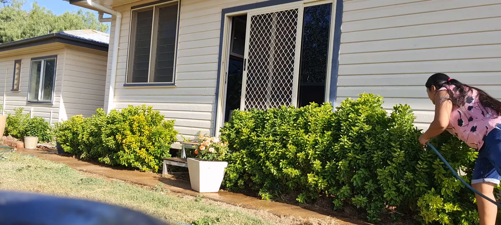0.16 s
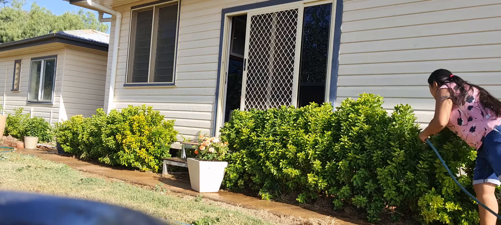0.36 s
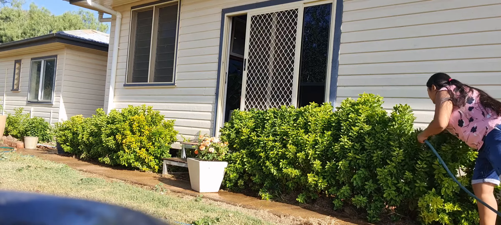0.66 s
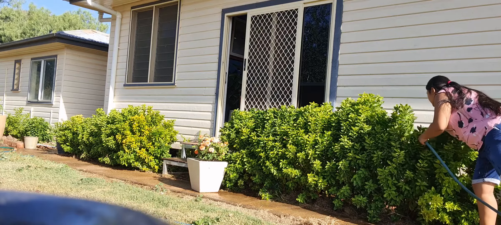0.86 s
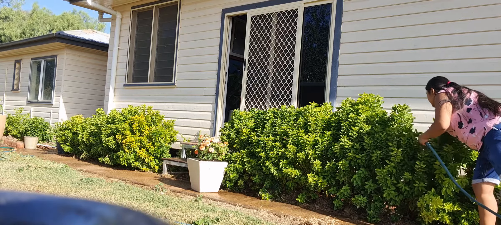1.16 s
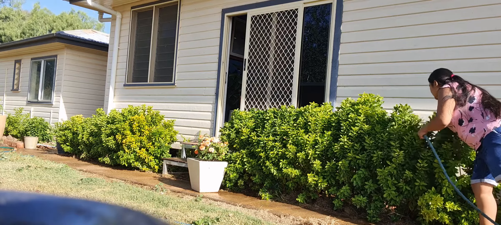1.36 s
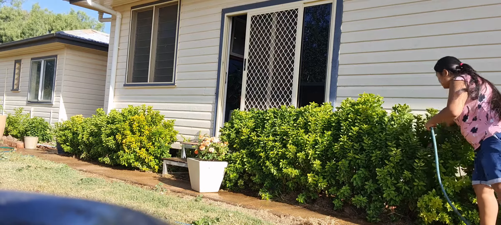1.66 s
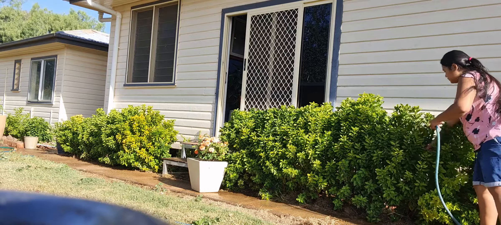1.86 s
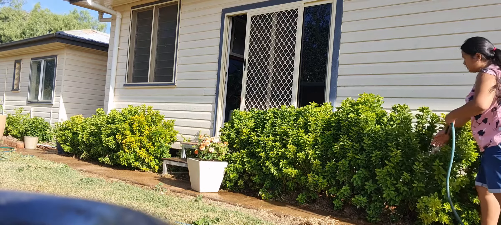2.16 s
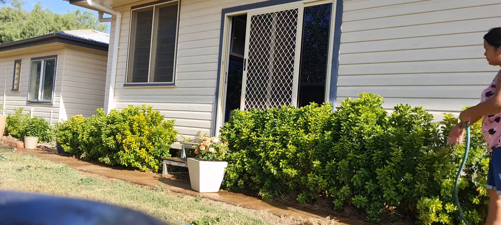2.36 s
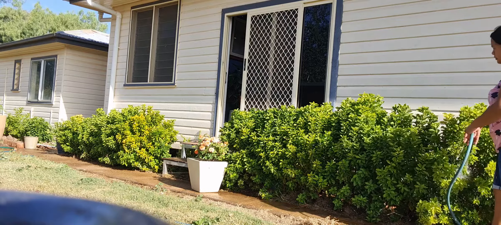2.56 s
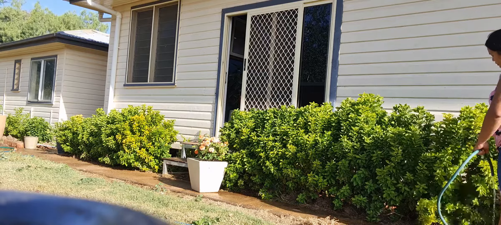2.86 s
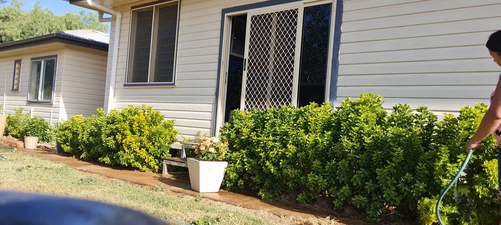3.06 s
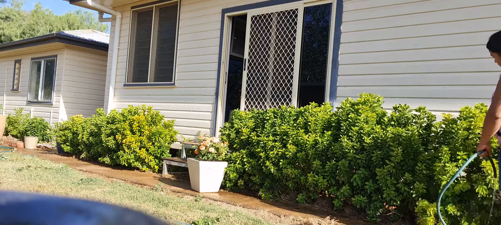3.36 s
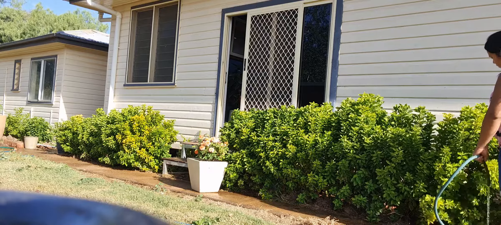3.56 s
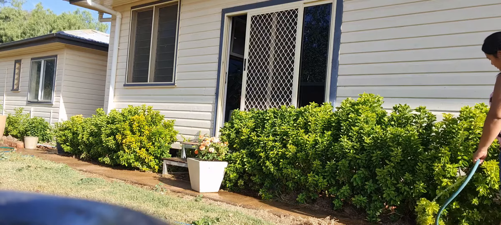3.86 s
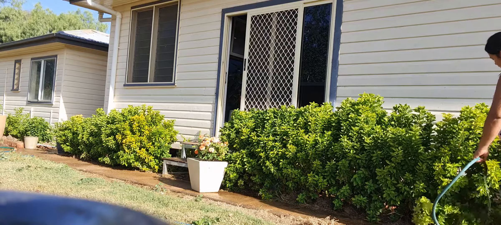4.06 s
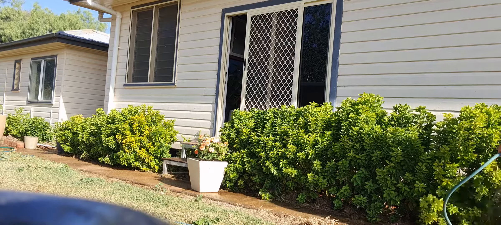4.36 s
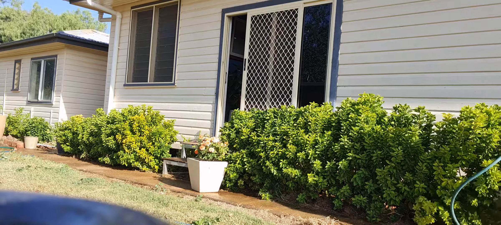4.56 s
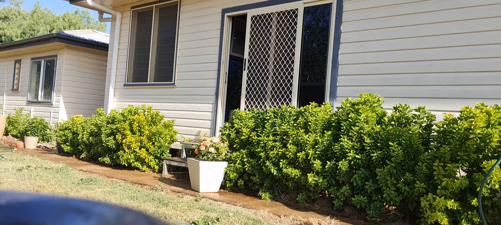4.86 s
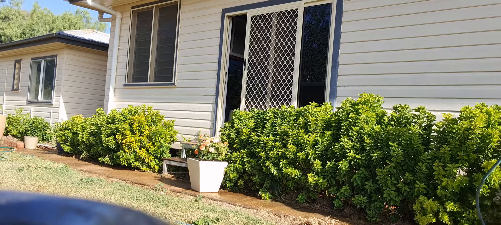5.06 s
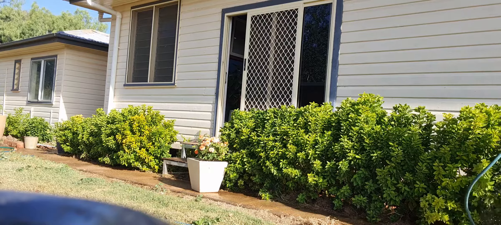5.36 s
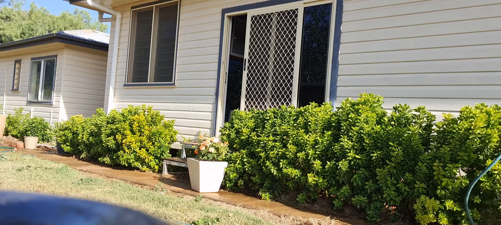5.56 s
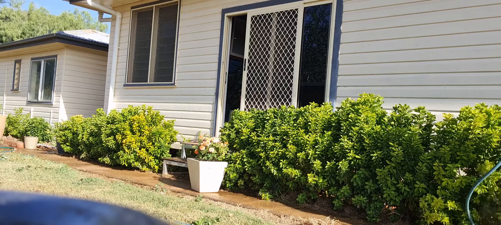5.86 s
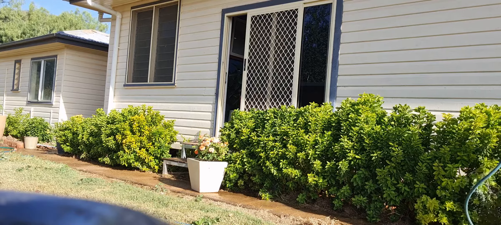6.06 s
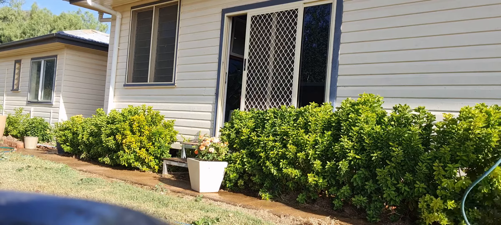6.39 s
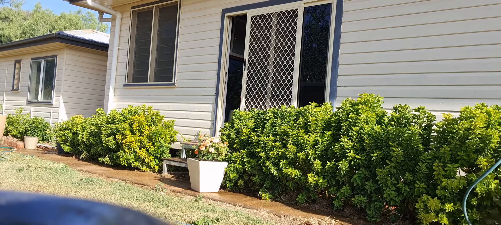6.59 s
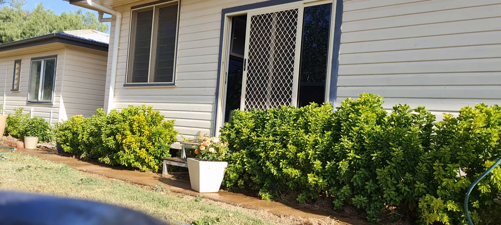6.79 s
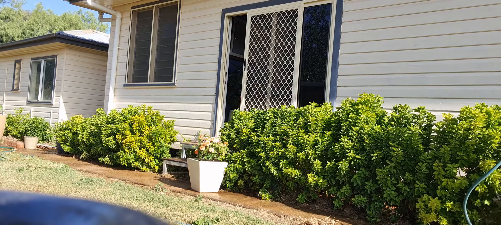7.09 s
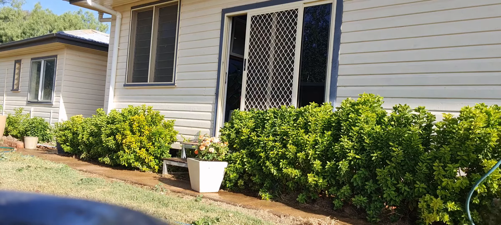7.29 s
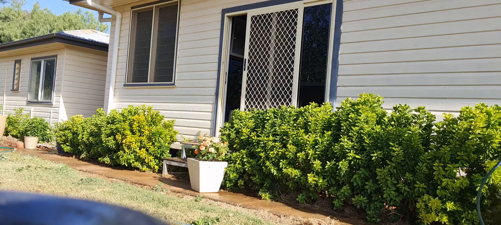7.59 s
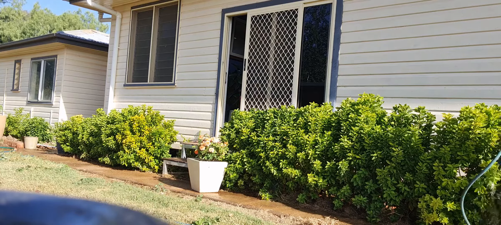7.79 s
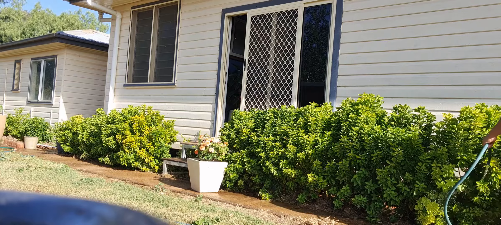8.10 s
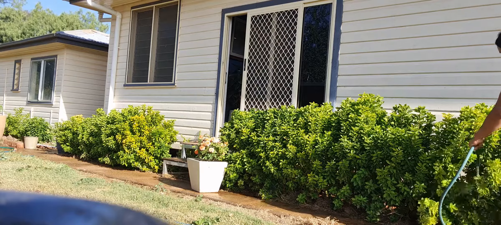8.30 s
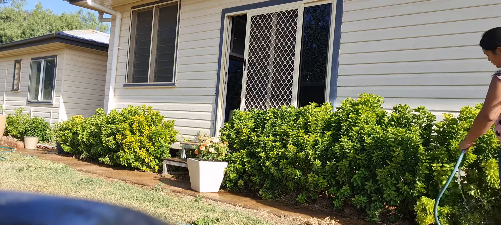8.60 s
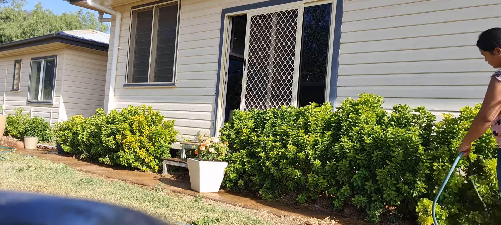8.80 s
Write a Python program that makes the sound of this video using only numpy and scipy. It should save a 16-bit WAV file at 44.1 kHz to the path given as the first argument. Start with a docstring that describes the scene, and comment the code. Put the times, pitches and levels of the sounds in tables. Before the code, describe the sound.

Water from a hose patters and fizzes over shrubs outdoors, with crisp leaf ticks, small puddle plops, a brief distant bird call and wind bumps.

```python
"""Garden hose on a hedge

A hose, a little to the right, waters a hedge beside a house wall. The spray is a cloud of damped rings:
patter on leaves, hiss of mist, splatter on soil. Single gouts slap leaves (a sagging tick, a knock and
noise) or plop into a puddle (a bubble rising in pitch). A far bird whistles six short notes, a breeze of
filtered noise and low eddies rumbles and thumps on the two microphone ports, and beneath lie a murmur with
a fuzzy hum, faint hoots and hollow bumps. Decaying noise tails give the scatter from foliage and wall."""
import sys
import numpy as np
from scipy import signal
from scipy.fft import rfft, irfft, next_fast_len
from scipy.io import wavfile
from scipy.ndimage import map_coordinates

SR = 44100
rng = np.random.default_rng(int(sys.argv[2]) if len(sys.argv) > 2 else 0)


def inscribe(sig):
    """Save sig as 16-bit PCM at rate SR to the path in sys.argv[1].

    A 1-D sig is mono; a 2-D sig holds one channel per row.
    Samples are clipped to [-1, 1] before scaling.
    """
    pcm = np.round(np.clip(np.atleast_2d(sig).T, -1, 1) * 32767)
    wavfile.write(sys.argv[1], SR, pcm.astype(np.int16))


N = 394254
TOP_HZ = 15850  # upper band limit

# Levels of layers and events stand before the trims and reverberation of their functions.

# Murmur of the neighbourhood, spectral shape: (frequency [Hz], gain [dB])
MURMUR_SPECTRUM = [(20, 4), (60, 10), (90, 16), (140, 5.5), (220, 4.5), (320, 4), (500, 5.5), (700, 4.5),
                   (1000, 5), (1500, 2.5), (3000, -18), (16000, -28)]
# Left-right correlation of the murmur: (frequency [Hz], correlation [-1 to 1])
MURMUR_CORRELATION = [(60, 1), (200, 0.69), (450, 0.38), (800, 0), (2000, 0)]
# Faint far hoots and a thin whistle: (time [s], pitch [Hz], level [dB], half length [s])
HOOTS = [(1.5, 472, -76, .09), (1.71, 502, -65.5, 0.047), (7.615, 1860, -69.5, 0.059)]
# Soft hollow bumps: (time [s], level [dB], pitch [Hz], 60 dB decay time [s])
BUMPS = [(1.315, -42, 186, 0.068), (4.868, -56, 170, 0.12), (6.587, -53, 255, 0.12),
         (7.089, -52, 250, 0.078)]

# Bird notes: (time [s], final pitch [Hz], level [dB])
BIRD_NOTES = [(5.046, 2520, -59), (5.232, 2530, -56.5), (5.406, 2510, -57), (5.585, 2344, -57.5),
              (5.745, 2404, -53.5), (5.924, 2380, -53.5)]
BIRD_ECHO_S = 0.045  # the call comes back off the house wall

# Wind rumble at the ports, spectral shape: (frequency [Hz], gain [dB])
RUMBLE_SPECTRUM = [(15, -5.5), (30, 0), (55, -0.5), (85, -3), (120, -14), (200, -36), (400, -53),
                   (1000, -84)]
CALM_DB = -72  # rumble between gusts
# Slow gusts of the breeze: (time [s], rumble level [dB], half length [s])
GUSTS = [(0.7, -78, 0.99), (5.997, -59, 0.77), (8.453, -61.5, 0.39)]
# Sudden puffs on the ports: (time [s], level [dB], pitch [Hz], half length [s], left over right [dB])
PUFFS = [(4.823, -55, 52.5, 0.033, 8), (5.024, -56, 41.7, 0.019, 7), (5.236, -47.5, 45.4, 0.017, 4),
         (5.371, -50.5, 43.4, 0.028, 5), (5.747, -50.5, 39, 0.02, 11), (5.98, -32.5, 61.6, 0.018, 7),
         (6.004, -45, 98.7, 0.027, 3), (6.031, -37, 44, 0.02, -2), (6.144, -41.5, 46.7, 0.028, 2),
         (6.46, -48, 45.5, 0.022, 13), (6.956, -53, 53.6, 0.014, 11), (7.055, -54, 42.4, 0.012, 7),
         (8.039, -52.5, 55.2, 0.033, 2), (8.477, -34.5, 48.6, 0.016, 1), (8.523, -29, 71.4, 0.0084, 0),
         (8.551, -43, 87, 0.016, -2), (8.632, -50.5, 56.4, 0.029, -8), (8.715, -45, 52.3, 0.0065, -7)]
# Eddy sizes within a puff: (multiple of its pitch [ratio], relative level [dB])
PUFF_EDDIES = [(.55, -2), (1, 0), (1.5, -5.5), (2.2, -16), (3.1, -26.5)]

# Scatter from foliage and wall, its decay: (frequency [Hz], 60 dB decay time [s])
SCATTER_DECAY = [(300, 0.067), (3000, 0.073), (12000, 0.028)]
# Strength of that scatter: (frequency [Hz], gain [dB])
SCATTER_COLOUR = [(300, -3.5), (1200, -0.5), (2400, -3), (3600, 1.5), (16000, -1)]
# Bearing of the water: (time [s], delay of the left port behind the right [samples])
WATER_BEARING = [(0, 7.5), (1.6, 7.25), (2.6, 8.8), (4.0, 8.26), (4.45, 11.8), (5.7, 11.1), (6.18, 9.8),
                 (6.8, 11.4), (7.5, 10.4), (8.0, 9.9), (8.9, 8.7)]

# Gouts plopping into the puddle under the hedge: (time [s], level [dB], middle bubble pitch [Hz])
PLOPS = [(1.075, -47, 1830), (1.208, -42.5, 2330), (1.215, -50, 2010), (1.237, -46, 2150),
         (2.077, -46, 1760), (2.1178, -43, 1870), (2.133, -49, 1730), (2.9068, -58, 1780)]
PLOP_T60_S, PLOP_RISE, PLOP_SPLAT_DB = 0.034, 0.096, -4  # decay, share of pitch rise, splatter over bubble

# Gouts hitting leaves: (time [s], level [dB], pitch [Hz], fizz [dB], body [dB], contact time [s]: long = soft)
SLAPS = [(0.929, -28.5, 3700, -26, -30, 0.0021), (1.205, -39, 4500, -16, -26, 0.0016),
         (1.5362, -37, 3780, -19, -29, 0.0014), (1.8782, -33, 5750, -12, -22, .0005),
         (1.8823, -33.5, 5800, -2, -28, 0.00031), (1.9765, -35, 6200, 1.5, -30, 0.00027),
         (2.0328, -39, 4400, 0, -25, 0.00036), (2.0667, -35, 5840, 4, -23, 0.00032),
         (2.162, -46, 6100, -20, -28, .001), (2.224, -29, 6100, -8, -35, .0005),
         (2.3705, -40, 4600, -11, -25, 0.00042), (2.3896, -34, 3900, -14, -36, 0.0005),
         (2.552, -28, 7500, -10, -32, .0003), (2.569, -22, 5240, -24, -10, 0.0005),
         (2.5778, -24, 5900, -16, -41, 0.00056), (2.5835, -26, 6500, -17, -35, .0003),
         (2.592, -20.5, 4880, -29, -42, 0.00066), (2.613, -30.5, 5700, 6, -33, .0005),
         (2.6283, -23.5, 5520, -3.5, -32, 0.00045), (2.7767, -32.5, 4900, -12, -30, 0.0002),
         (3.2395, -37, 5000, -12, -25, .0003), (3.257, -31, 5300, -21, -26, 0.00033),
         (3.3134, -38, 5500, -8, -28, .0003), (3.335, -32, 5200, -11, -32, 0.00035),
         (3.673, -32.5, 4900, -18, -30, 0.00035), (3.737, -32, 4300, -18, -14, .0005),
         (3.7797, -31, 4500, -32, -26, .0007), (3.792, -31, 4170, -20, -28, .0004),
         (3.8388, -35, 5730, -5, -28, .0007), (3.8462, -35.5, 4060, 5.5, -9, 0.0007),
         (3.867, -36, 5070, -15, -25, 0.00033), (3.9727, -31, 5700, -8, -32, 0.00059),
         (3.9937, -21.5, 5840, -10, -16, 0.00012), (4.0873, -31, 4160, -30, -27, 0.00076),
         (4.3628, -34.5, 3050, -14, -18, 0.00046), (4.4007, -37, 4100, -18, -26, 0.00068),
         (4.567, -41, 4400, -15, -21, .0004), (4.6927, -32.5, 5860, -25, -18, 0.00098),
         (5.19, -27.5, 3680, -18, -21, 0.00024), (5.3737, -33, 4040, -6, -29, 0.00025),
         (5.391, -33, 4430, -15, -26, 0.00026), (5.399, -34, 4200, -15, -26, .0002),
         (5.409, -33, 3670, -13, -28, .0002), (5.9953, -40, 5000, -10, -28, 0.00022),
         (6.0138, -27, 3700, -3, -34, 0.00041), (6.151, -36.5, 5600, -3, -28, .0003),
         (6.1763, -18, 4700, -24, -46, 0.00022), (6.238, -33, 4100, -26, -28, .0004),
         (6.2566, -31, 4080, -19, -24, 0.00036), (6.283, -32, 4180, -15, -28, .0005),
         (6.497, -33, 4170, -9, -21, 0.00042), (6.6245, -35, 4800, -12, -30, 0.0005),
         (6.7645, -36, 3550, -23, -28, .0005), (6.973, -35.5, 4420, -9, -7, 0.00075),
         (7.1083, -35, 4300, -15, -22, .0002), (7.2943, -34.5, 3900, -4, -26, .0004),
         (7.3394, -35, 4400, -12, -20, 0.00027), (7.483, -33.5, 3460, -22, -26, .0004),
         (7.378, -34.5, 4800, -8, -28, 0.00027), (8.039, -26.5, 5100, -22, -37, 0.0002),
         (8.3803, -25.5, 5050, -30, -49, 0.00027), (8.553, -30.5, 6700, -17, -36, 0.00016),
         (8.681, -34, 4270, -18, -28, 0.00035), (8.7806, -30.5, 4020, -5, -36, 0.0004)]
SLAP_T60_S = 0.044  # a wet leaf is damped at once

# Steady jet as it wanders over the hedge: (time [s], leaf patter level [dB])
JET = [(0, -62), (0.9, -58), (1.02, -59), (1.15, -57.5), (1.6, -60.5), (2.2, -58.5), (2.31, -61),
       (2.5, -56.5), (2.82, -59), (3.1, -56.5), (3.5, -59.5), (4.1, -57), (4.29, -60.5), (4.6, -55),
       (4.97, -63.5), (5.12, -63), (5.5, -56.5), (5.62, -55), (5.68, -61.5), (5.8, -56), (6.43, -56.5),
       (6.55, -61.5), (6.68, -54.5), (6.85, -61), (7.3, -54.5), (7.7, -60), (7.82, -60.5), (8.1, -55.5),
       (8.65, -56.5), (8.72, -61.5), (8.94, -55)]
# More water bursts into mist once the nozzle is lifted: (time [s], mist over patter [dB])
MISTING = [(0, -1.5), (1.5, -2), (2.2, 0), (7, 0.8)]
# The jet catches a bunch of leaves and splashes:
# (time [s], patter level [dB], half length [s], mist over patter [dB], soil over patter [dB])
SPLASHES = [(0.118, -56.5, 0.017, -5, 3), (0.313, -56.5, 0.028, -0.5, -1), (0.702, -55.5, 0.011, 0.5, 1),
            (0.782, -56.5, 0.009, 1, -18), (1.218, -49, 0.011, -2.5, -2), (1.233, -55.5, 0.0064, -2.5, -1),
            (1.266, -50, 0.016, -6, -10), (1.378, -53, 0.024, -2, -1), (1.443, -55.5, 0.015, -3, -16),
            (1.55, -56.5, 0.018, -2, -20), (1.84, -59.5, 0.052, 2.5, 3), (1.99, -53, 0.018, 0, -16),
            (2.065, -53, 0.024, 0.5, 0), (2.2, -54, 0.053, 0.5, -0.5), (2.392, -46.5, 0.017, -3.5, -8),
            (2.598, -42, 0.038, 1.5, -9), (2.737, -53, 0.036, -0.5, -4), (2.898, -54, 0.028, -20, 4.5),
            (3.254, -49.5, 0.016, 1.5, -1.5), (3.334, -52, 0.018, 2.5, -8), (3.658, -51.5, 0.038, -4, -19),
            (3.757, -48, 0.023, -3, -9), (3.794, -49, 0.015, -3.5, -7), (3.865, -50, 0.024, 2, -13),
            (3.917, -55.5, 0.016, 2.5, -20), (3.998, -51, 0.027, 7.5, 2), (4.144, -55.5, .02, -0.5, -10),
            (4.208, -54, 0.021, 0.5, 2), (4.374, -55, 0.02, -7, -4), (4.578, -50, 0.018, -0.5, -8),
            (4.882, -60, 0.023, 1.5, 5.5), (5.034, -59.5, 0.015, 6, 6.5), (5.237, -50, 0.061, -1.5, -17),
            (5.38, -50.5, 0.035, 2.5, -29), (5.759, -52.5, 0.023, -4, -5), (6.014, -52, 0.016, 0, -17),
            (6.18, -52, 0.019, 6, -23), (6.31, -55.5, 0.029, 3.5, -20), (6.615, -53.5, 0.02, 0.5, -20),
            (6.773, -53, 0.028, -5.5, -21), (7.358, -50, 0.019, 0.5, -25), (7.253, -61, 0.023, -3, -20),
            (7.53, -53, 0.038, -7, -18), (7.858, -55, 0.066, 3, -8), (8.06, -59.5, 0.065, 6, -13),
            (8.443, -55, 0.029, -5, -22), (8.772, -52.5, 0.017, 1, -3), (8.893, -51, 0.0078, 1, -16)]
SPLASH_SKEW = 1.01  # factor by which a splash rises faster and drains slower than its half length
# Shapes given to the patter, mist and soil clouds: (frequency [Hz], gain [dB])
LEAF_SPECTRUM = [(300, -26), (1200, -26.5), (2450, -5), (3300, 0), (4600, 2.5), (6500, -1.5), (9000, 4.5),
                 (16000, 3.5)]
MIST_SPECTRUM = [(1500, -25), (4000, -8), (6000, -2), (8000, -3.5), (10200, -5), (11700, 2), (13000, -3.5),
                 (15800, -0.5)]
SOIL_SPECTRUM = [(120, -17), (350, -3.5), (900, -2.5), (1400, -4), (1800, 7.5), (2400, 7), (4500, 19.5),
                 (10000, -46)]
# Pitch of struck leaves at equal mist and patter; harder hits make more mist and ring higher.
LEAF_HZ, LEAF_OCTAVES_PER_DB = 4670, 0.28
CLUMPS_PER_S, SWAYS_PER_S, SWAY_DB = 55, 17, 0.53  # the jet breaks into clumps; leaves sway in and out of it
RUNOFF_DB, DRIPS_DB = -3, -12  # steady soil splatter, and stray big drops on near leaves, over the patter


def amp(db):
    """Level law: decibels to an amplitude ratio."""
    return 10 ** (np.asarray(db) / 20)


def unit(x):
    """Normalisation to an rms of 1."""
    return x / np.sqrt(np.mean(x ** 2) + 1e-20)


def along(points, hz):
    """Interpolation of (frequency, value) points on a logarithmic frequency axis."""
    f, v = np.transpose(points)
    return np.interp(np.log(hz + 1), np.log(f + 1), v)


def curves(rows):
    """Linear interpolation in time: one value a sample for each column after the time."""
    times, *columns = np.transpose(rows)
    return [np.interp(np.arange(N) / SR, times, column) for column in columns]


def wobble(rate):
    """Smooth random fluctuation through rate Gaussian knots a second."""
    knots = rng.standard_normal(4096)
    return map_coordinates(knots, [np.arange(N) * rate / SR], mode="wrap")


def swell(s, half, skew=1):
    """Gaussian rise and fall about time s; a skew above 1 steepens the rise and draws out the fall."""
    t = np.arange(N) / SR - s
    width = np.where(t < 0, half / skew, half * skew)
    return np.exp(-.5 * np.minimum((t / width) ** 2, 100))


def filtered(x, response):
    """Linear filtering: the spectrum of x times a response of frequency."""
    n = x.shape[-1]
    m = next_fast_len(n + 4096)
    hz = np.fft.rfftfreq(m, 1 / SR)
    return irfft(rfft(x, m) * response(hz), m)[..., :n]


def coloured(x, spectrum):
    """Spectral shaping of x, brought to rms 1."""
    return unit(filtered(x, lambda hz: amp(along(spectrum, hz))))


def band(x, centre_hz, q):
    """Second-order resonance applied twice to x, brought to rms 1."""
    def resonance(hz):
        damping = 1j * hz * centre_hz / q
        return (damping / (centre_hz ** 2 - hz ** 2 + damping)) ** 2

    return unit(filtered(x, resonance))


def yard(x, wet_db):
    """Diffuse reverberation of foliage and wall: separate noise tails at the ports shift as the leaves move."""
    hop, size = SR // 16, SR // 8  # a fresh tail serves each hop
    starts = range(0, N, hop)
    noise = rng.standard_normal((len(starts), 2, size))
    hz, t, z = signal.stft(noise, SR, nperseg=256)
    decay_db = along(SCATTER_COLOUR, hz)[:, None] - 60 * t / along(SCATTER_DECAY, hz)[:, None]
    tails = signal.istft(z * amp(decay_db), SR, nperseg=256)[1]
    tails /= np.linalg.norm(tails, axis=-1, keepdims=True)
    wet = np.zeros((2, N + SR))
    for start, tail in zip(starts, tails):
        answer = signal.fftconvolve(x[:, start:start + hop], tail, axes=1)
        wet[:, start:start + answer.shape[1]] += answer
    return x + amp(wet_db) * wet[:, :N]


def at_ports(x, s):
    """Arrival-time difference: a short sound from the water at time s reaches the left port later."""
    lag = np.interp(s, *np.transpose(WATER_BEARING)) / SR
    left = filtered(x, lambda hz: np.exp(-2j * np.pi * hz * lag))
    return np.array([left, x])


def outdoors():
    """Partly correlated noise at two ports: the far murmur of the neighbourhood, with a faint fuzzy hum."""
    def mid_side_gains(hz):
        angle = np.arccos(np.clip(along(MURMUR_CORRELATION, hz), -1, 1)) / 2
        return np.array([np.cos(angle), np.sin(angle)])

    mid, side = filtered(rng.standard_normal((2, N)), mid_side_gains)
    murmur = coloured(np.array([mid + side, mid - side]), MURMUR_SPECTRUM)
    hum = amp(-78.5) * band(rng.standard_normal(N), 825.0, q=29.0)
    return amp(-64.0) * murmur + hum


def hoots(q=30):
    """Narrow-band noise under a slow envelope: soft tones, blurred by distance."""
    out = np.zeros(N)
    for s, pitch_hz, db, half in HOOTS:
        out += amp(db) * swell(s, half) * band(rng.standard_normal(N), pitch_hz, q=q)
    return out


def bumps(rise_s=0.0034):
    """Decay of a single mode: faint hollow knocks, each with a soft start."""
    out, t = np.zeros(N), np.arange(SR // 4) / SR
    for s, db, pitch_hz, t60 in BUMPS:
        envelope = amp(db - 60 * t / t60) * (1 - np.exp(-t / rise_s))
        out[round(s * SR):][:len(t)] += envelope * np.sin(2 * np.pi * pitch_hz * t)
    return out


def bird(fall=.07, glide_s=.018, length_s=.08, rough=.009):
    """Frequency modulation: each whistle dips quickly to its final pitch and quavers; a faint echo follows."""
    song, t = np.zeros(N), np.arange(int(length_s * SR)) / SR
    for s, pitch_hz, db in BIRD_NOTES:
        quaver = rough * band(rng.standard_normal(len(t)), 80, q=0.9)
        hz = pitch_hz * (1 + fall * np.exp(-t / glide_s) + quaver)
        phase = 2 * np.pi * np.cumsum(hz) / SR
        song[round(s * SR):][:len(t)] += amp(db) * np.sin(np.pi * t / length_s) ** 2 * np.sin(phase)
    song = song + amp(-13) * np.roll(song, round(BIRD_ECHO_S * SR))
    return yard(song * amp([[1.0], [-1.0]]), wet_db=-6)


def breeze():
    """Turbulent pressure: eddies rumble at the ports, only partly alike; sudden puffs thump."""
    strength = amp(CALM_DB) + sum(amp(db) * swell(s, half) for s, db, half in GUSTS)
    lumps = amp(1.3 * np.array([wobble(15), wobble(29)]))
    noise = rng.standard_normal((2, N)) + 0.5 * rng.standard_normal(N)
    rumble = coloured(noise, RUMBLE_SPECTRUM)
    out = strength * unit(lumps * rumble) * amp([[.8], [-.8]])
    t = np.arange(-SR // 8, SR // 8) / SR
    count = len(PUFF_EDDIES)
    for s, db, pitch_hz, half, pan_db in PUFFS:
        # each eddy has a shared random phase, scattered between the ports
        phases = rng.uniform(0, 2 * np.pi, (count, 1, 1)) + 1.22 * rng.standard_normal((count, 2, 1))
        eddies = np.zeros((2, len(t)))
        for (ratio, level_db), phase in zip(PUFF_EDDIES, phases):
            eddies += amp(level_db) * np.sin(2 * np.pi * ratio * pitch_hz * t + phase)
        puff = unit(eddies) * np.exp(-.5 * (t / half) ** 2)
        port_gains = amp([[db + pan_db / 2], [db - pan_db / 2]])
        out[:, round((s + t[0]) * SR):][:, :len(t)] += puff * port_gains
    return out


def plops(attack_s=0.00065, rise_s=0.017):
    """Bubble resonance: a gout breaks the puddle with a splatter and traps a ringing bubble of rising pitch."""
    out, t = np.zeros((2, N + SR)), np.arange(SR // 12) / SR
    envelope = amp(-60 * t / PLOP_T60_S) * (1 - np.exp(-t / attack_s))
    for s, db, pitch_hz in PLOPS:
        bubble_hz = pitch_hz * (1 + PLOP_RISE * (.5 - np.exp(-t / rise_s)))
        bubble = np.sin(2 * np.pi * np.cumsum(bubble_hz) / SR)
        splatter = amp(PLOP_SPLAT_DB) * band(rng.standard_normal(len(t)), pitch_hz, q=1.5)
        plop = amp(db) * envelope * (bubble + splatter)
        out[:, round(s * SR):][:, :len(t)] += at_ports(plop, s)
    return yard(out[:, :N], wet_db=-1)


def slaps(push_s=0.0001, bend=0.19):
    """Impact of a gout on a leaf: a tick that sags in pitch, a dull knock, and a smack and fizz as it bursts."""
    out, t = np.zeros((2, N + SR)), np.arange(SR // 12) / SR
    for s, db, pitch_hz, fizz_db, body_db, contact_s in SLAPS:
        contact = amp(-60 * t / SLAP_T60_S) * (1 - np.exp(-(t / (0.49 * contact_s)) ** 2))
        noise = rng.standard_normal((3, len(t))) * contact
        smack = band(noise[0], pitch_hz, q=1.03)
        fizz = amp(fizz_db + 8.5) * band(noise[1], 8800, q=0.57)
        splat = amp(body_db - 11) * band(noise[2], 890, q=1.0)
        # undo the rms scaling so that the envelope's peak sets the level
        burst = amp(-16) * (smack + fizz + splat) * np.std(contact) / contact.max()
        struck = np.maximum(t - .0012, 0)  # the core of the gout lands just after its fringe
        u = struck / contact_s
        sagging_phase = 2 * np.pi * pitch_hz * struck * (1 + bend * np.exp(-u / 2))
        tick = amp(-5.5) * u * np.exp(1 - u) * np.sin(sagging_phase)
        knock = amp(body_db + 1.5) * np.exp(-((t - .0014) / push_s) ** 2)  # the leaf gives way in one push
        slap = amp(db) * (tick + knock + burst)
        out[:, round(s * SR):][:, :len(t)] += at_ports(slap, s)
    return yard(out[:, :N], wet_db=-7)


def flow():
    """Addition of powers: splashes join the steady jet, which swaying leaves vary; gains of leaf, mist, soil."""
    jet_db, = curves(JET)
    misting_db, = curves(MISTING)
    jet_db = jet_db + SWAY_DB * wobble(SWAYS_PER_S)
    power = amp([jet_db, jet_db + misting_db, jet_db + RUNOFF_DB]) ** 2
    for s, db, half, mist_db, soil_db in SPLASHES:
        splash = amp([[db], [db + mist_db], [db + soil_db]])
        power += splash ** 2 * swell(s, half, SPLASH_SKEW) ** 2
    return np.sqrt(power)


def drops(count, pitch_hz, spread, cycles, scatter_db, width, size):
    """Superposed random impacts: damped rings, each with its own pitch, strength and bearing.

    spread is in log frequency, cycles is the 1/e decay, width [samples] scatters the bearing,
    and size [samples] is the length of a ring."""
    chance = rng.standard_normal((count, 3))
    start = rng.uniform(0, N - 1, count)
    centre_hz = np.broadcast_to(pitch_hz, N)[start.astype(int), None]
    hz = np.clip(centre_hz * np.exp(spread * chance[:, :1]), 200, TOP_HZ)
    strength = amp(scatter_db * np.minimum(chance[:, 1:2], 2.6))
    lag = np.interp(start / SR, *np.transpose(WATER_BEARING)) + width * chance[:, 2]
    ports = []
    for arrival in (start + np.abs(lag), start):  # left, right
        index = np.ceil(arrival).astype(int)[:, None] + np.arange(size)
        turns = (index - arrival[:, None]) * hz / SR
        ring = strength * np.exp(-turns / cycles) * np.sin(2 * np.pi * turns)
        ports.append(np.bincount(index.ravel(), ring.ravel(), N)[:N])
    return np.array(ports)


def spray():
    """Dense impact noise: drops drum on leaves, mist fizzes, and run-off splatters and bubbles on the soil."""
    on_leaf, as_mist, on_soil = flow()
    mist_over_leaf_db = 20 * np.log10(as_mist / on_leaf)
    leaf_hz = LEAF_HZ * 2 ** (LEAF_OCTAVES_PER_DB * mist_over_leaf_db)
    flutter = wobble(CLUMPS_PER_S)

    leaf = drops(count=7000, pitch_hz=leaf_hz, spread=0.44, cycles=0.38, scatter_db=3.5, width=0.81, size=64)
    heavy = drops(count=1500, pitch_hz=leaf_hz, spread=0.25, cycles=6.2, scatter_db=7.0, width=0.25, size=200)
    mist = drops(count=36000, pitch_hz=10260, spread=0.44, cycles=0.42, scatter_db=1.0, width=1.39, size=12)
    soil = drops(count=8000, pitch_hz=1553, spread=0.414, cycles=3.3, scatter_db=3.0, width=0.1, size=200)
    drips = drops(count=300, pitch_hz=leaf_hz, spread=0.26, cycles=1.03, scatter_db=0.5, width=0.65, size=160)

    patter = coloured(leaf, LEAF_SPECTRUM) + amp(-15.5) * unit(heavy) + amp(DRIPS_DB) * unit(drips)
    patter = patter * on_leaf * amp(-3.5 + 1.54 * flutter)
    hiss = coloured(mist, MIST_SPECTRUM) * as_mist * amp(-1.5 + 1.46 * flutter)
    hiss = hiss * amp([[-.6], [.6]])
    splatter = coloured(soil, SOIL_SPECTRUM) * on_soil * amp(-4.5 + 1.26 * wobble(30))
    return yard(patter + hiss + splatter, wet_db=-2.5)


def scene():
    """Superposition: background, bird and breeze around the water, which is a little to the right."""
    background = outdoors() + hoots() + bumps()
    water = (plops() + slaps() + spray()) * amp([[-.1], [.1]])
    return background + bird() + breeze() + water


def record(dry):
    """Band limitation: nothing passes above the upper limit."""
    return filtered(dry, lambda hz: hz < TOP_HZ)


dry = scene()
out = record(dry)
inscribe(out)
```